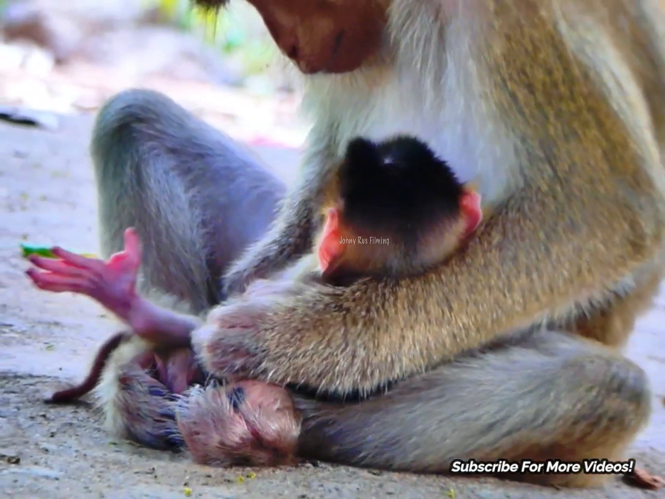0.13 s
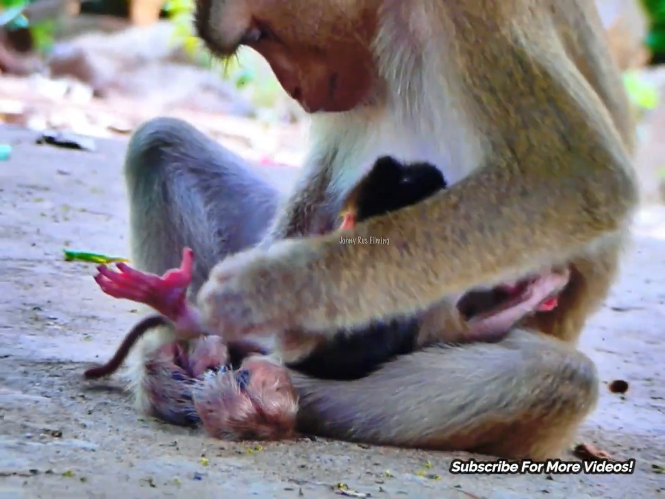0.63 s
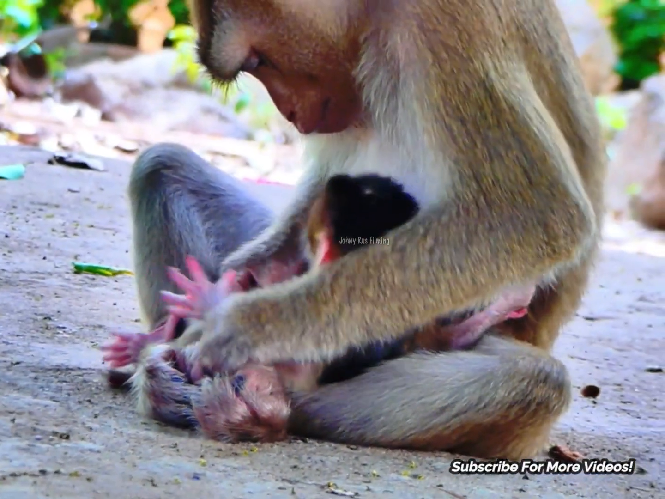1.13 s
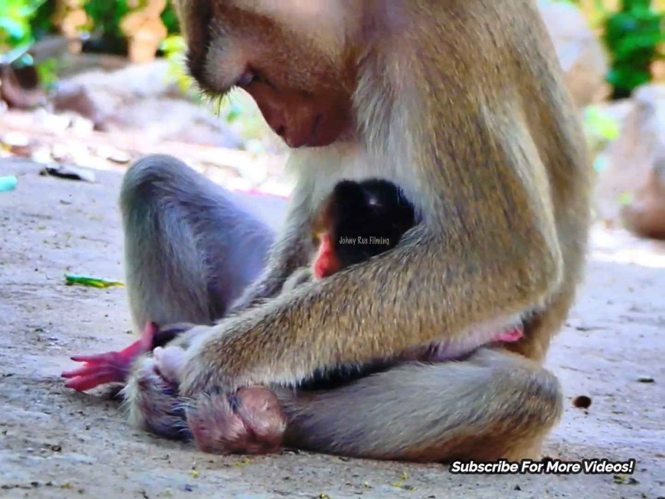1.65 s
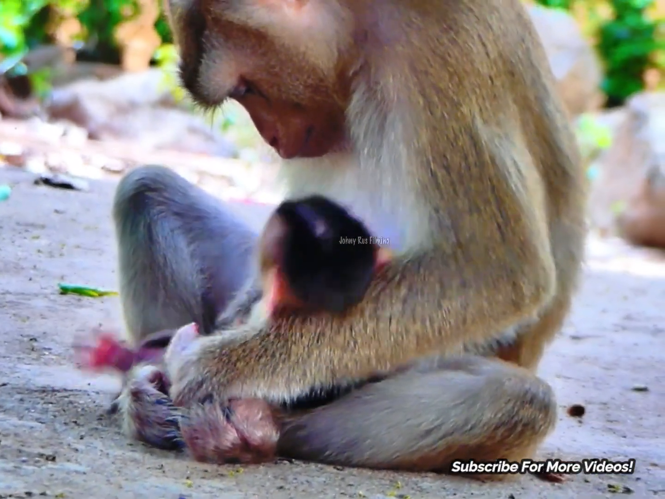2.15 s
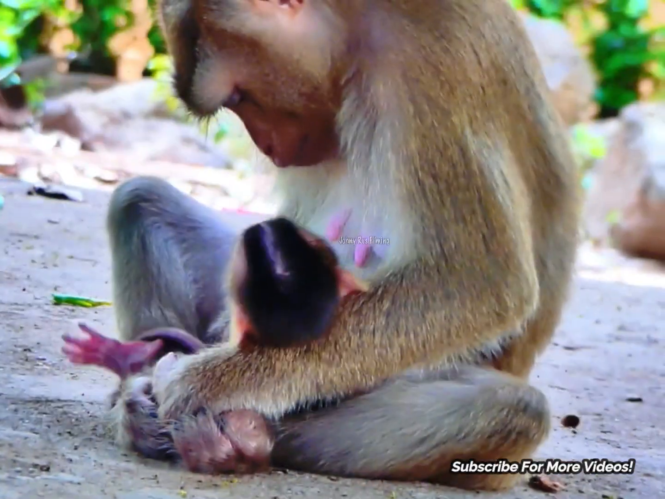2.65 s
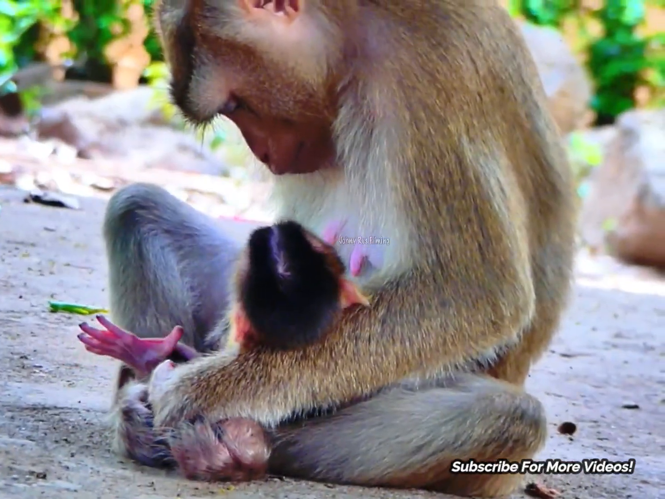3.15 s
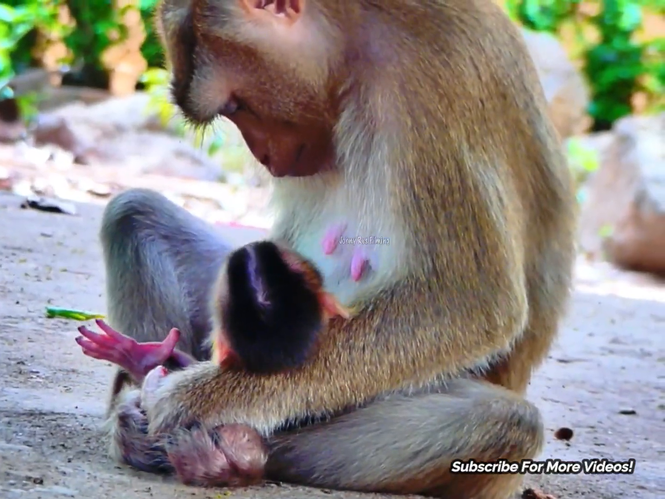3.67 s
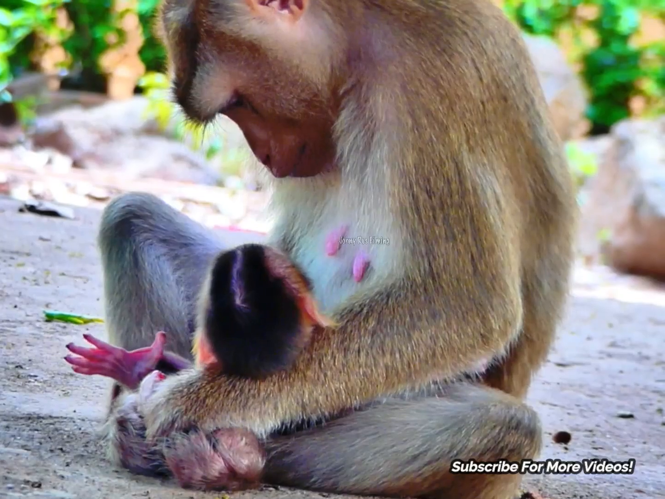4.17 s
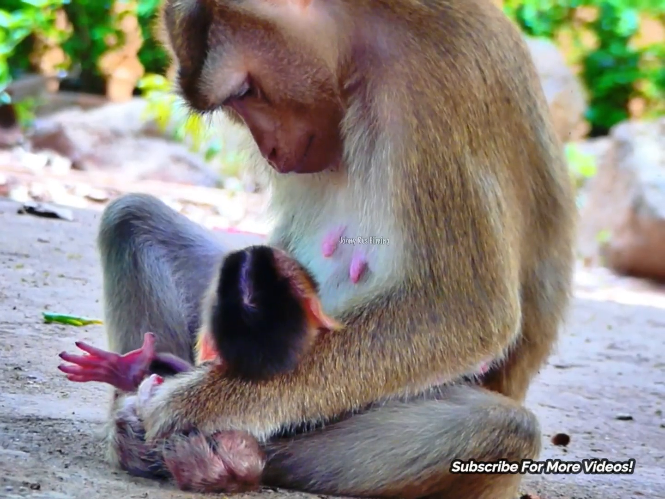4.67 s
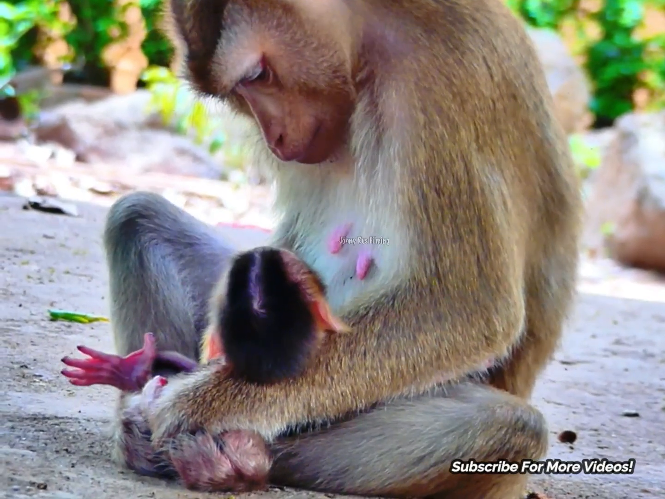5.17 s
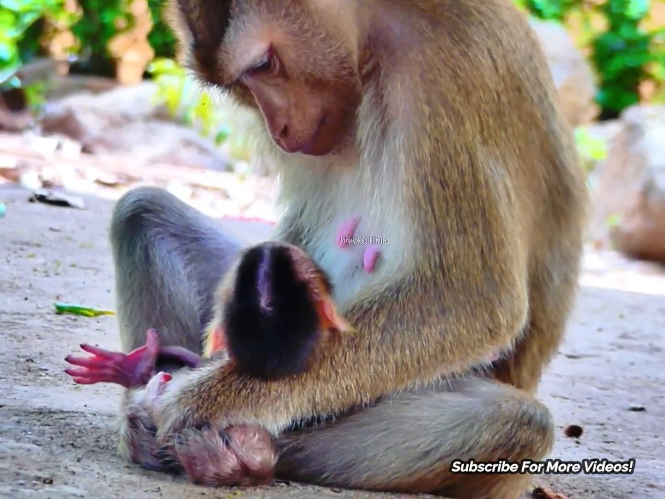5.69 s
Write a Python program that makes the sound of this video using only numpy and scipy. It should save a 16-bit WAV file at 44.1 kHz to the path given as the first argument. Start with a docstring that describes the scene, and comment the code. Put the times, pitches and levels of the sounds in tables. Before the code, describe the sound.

An open place under trees, with a steady soft wash of air, low wind swelling gently near 2.8 s, and a fuzzy insect whine flickering around 5 kHz with short cricket bursts. From 0 to 0.5 s a loud, close whistled trill leans left: six quick notes, each whipping upward, with close echoes. A tiny high bird chips about ten times a second almost throughout; a lower, rougher bird chips five or six times a second from 0.5 to 4.8 s, with short gaps. A young monkey gives brief fluttering, falling squeaks, the clearest near 2.2, 3.7 and 5.6 s, echoing through the trees. Soft breathy grunts come and go. Faint far coos drift from 1.7 to 4.6 s. Hands and feet scuff dry grit and leaves throughout, stronger around 2.65 s; twigs snap near 2.0, 3.0 and 4.3 s, and soft footfalls land near 2.7 and 5.5 s.

```python
"""Open ground under trees, with a soft wash of air, whining insects and light wind on the microphone.
At once a loud whistled trill of six rising notes close by, over two small birds chipping in steady rhythm;
then wet falling chirps from a young monkey and soft grunts, and later far coos, twig snaps and soft footfalls.
Hands and feet scuff the gritty ground throughout. Calls are swept tones, rustles are shaped noise, snaps are
ringing modes; sparse random echoes stand for the trunks and leaves that throw the calls back."""
import sys
import numpy as np
from scipy import signal
from scipy.io import wavfile
from scipy.ndimage import uniform_filter1d

SR = 44100
rng = np.random.default_rng(int(sys.argv[2]) if len(sys.argv) > 2 else 0)


def int16_out(signal):
    """Quantize to a 16-bit WAV file."""
    q = np.round(np.clip(np.atleast_2d(signal).T, -1, 1) * 32767)
    wavfile.write(sys.argv[1], SR, q.astype(np.int16))


def boost(x):
    """Linear amplitude factor 10**(x/20) for a level x in decibels (scalar or array-like)."""
    u = np.asarray(x, float) / 20
    return 10 ** u


N = 256220  # samples


def evened(x):
    """Scales to rms 1."""
    return x / np.sqrt(np.mean(x ** 2) + 1e-20)


def read(points, hz):
    """Reads a spectrum on a log-frequency axis."""
    f, value = np.transpose(points)
    return np.interp(np.log(hz + 1), np.log(f + 1), value)


def over_time(points):
    """Reads every column of a table against its first, t/s, at each sample."""
    s, *columns = np.transpose(points)
    return [np.interp(np.arange(N) / SR, s, column) for column in columns]


def add(mix, s, sound):
    """Mixes a sound in at s seconds."""
    part = mix[..., max(round(s * SR), 0):][..., :sound.shape[-1]]
    part += sound[..., :part.shape[-1]]


def sides(pan_db):
    """Left and right gains; pan_db is left over right."""
    return boost(np.array([[pan_db / 2], [-pan_db / 2]]))


def slow(rate_hz):
    """Slow random drift of rms 1, a sum of sines up to rate_hz."""
    t = np.arange(0, N, 64) / SR
    wave = np.zeros(len(t))
    for hz in np.geomspace(.15, rate_hz, num=20):
        wave += np.sin(2 * np.pi * (hz * t + rng.random())) / np.sqrt(hz)
    return np.repeat(evened(wave), 64)[:N]


def paired(a, b, c, d, same):
    """Two complex noises whose likeness is same (0-1)."""
    left, other = a + 1j * b, c + 1j * d
    return np.array([left, same * left + np.sqrt(1 - same ** 2) * other])


# likeness of left and right at the microphones: f/Hz, likeness/0-1
LIKENESS = [(60, .12), (400, 0.22), (1500, 0.19), (4000, 0.4), (12000, 0.6)]


def noise(colour, patchy_db, same=None):
    """Two-channel noise of a given spectrum with drifting patches, rms 1."""
    frames, hz = N // 128 + 6, np.fft.rfftfreq(512, 1 / SR)
    a, b, c, d, patches = rng.standard_normal((frames, 257, 5)).T
    patches = uniform_filter1d(patches, size=6, axis=0)  # over frequency
    patches = evened(uniform_filter1d(patches, size=20, axis=1))  # over time
    same = np.clip(read(LIKENESS, hz)[:, None] if same is None else same, 0, 1)
    z = paired(a, b, c, d, same) * boost(read(colour, hz)[:, None] + patchy_db * patches)
    return evened(signal.istft(z, nperseg=512, noverlap=384)[1][:, :N])


def fuzzy(hz, width_hz, same=0.59):
    """Noise squeezed into a narrow band around hz, rms 1: a hoarse tone."""
    low_pass = signal.butter(2, width_hz / SR, output="sos")
    fuzz = paired(*signal.sosfilt(low_pass, rng.standard_normal((N, 4)).T), same)
    return evened((fuzz * np.exp(2j * np.pi * hz * np.arange(N) / SR)).real)


def grains(per_s, spread_db, size):
    """Flickering gain of rms 1 from many tiny contacts of uneven strength, smoothed over size samples."""
    hits = boost(spread_db * np.minimum(rng.exponential(1, N), 4)) * (rng.random(N) < per_s / SR)
    return evened(0.099 + np.sqrt(abs(uniform_filter1d(hits ** 2, size))))


def whistle(hz, shape):
    """A pure tone on a pitch curve."""
    return shape * np.sin(2 * np.pi * np.cumsum(hz) / SR)


def trees(x, t60, gap=.004, same=.6):
    """Scatter from trunks and leaves: sparse random taps dying away after a gap in s, energy 1 on the left."""
    t = np.arange(SR // 2) / SR
    taps = rng.standard_normal((SR // 2, 3)).T * (rng.random((SR // 2, 3)).T < .15)
    taps = same * taps[2] + (1 - same) * taps[:2]
    taps = taps * boost(-60 * t / t60) * np.clip(t / gap - 1, 0, 1)
    return signal.fftconvolve(np.atleast_2d(x), taps / np.linalg.norm(taps[0]), axes=1)[:, :N]


# spectrum of the open air: f/Hz, level/dB per Hz (relative)
AIR_COLOUR = [(100, -22.5), (240, -6), (600, 0.5), (1130, 1.5), (1700, -4), (2400, -19), (3000, -26.5),
              (4100, -32), (4900, -20.5), (5800, -21.5), (7500, -9), (9000, -17), (11000, -21),
              (15800, -17.5)]


def air():
    """The steady wash of the place: coloured noise whose level drifts slightly."""
    return boost(-51 + 0.37 * slow(3.0)) * noise(AIR_COLOUR, 3.3)


# light wind on the microphone: t/s, level/dB
WIND_LEVEL = [(0.0, -64.5), (0.97, -67), (1.84, -62), (2.0, -65.5), (2.26, -62), (2.81, -55.5),
              (3.41, -65.5), (3.67, -61), (4.4, -61.5), (5.02, -67.5), (5.47, -61), (5.81, -63)]
# its spectrum: f/Hz, level/dB per Hz (relative)
WIND_SPECTRUM = [(15, -36), (35, -15), (70, -4.5), (150, -2.5), (300, -9), (500, -34.5)]


def wind():
    """Low rumble that swells and sinks, nearly unrelated at the two sides."""
    level_db, = over_time(WIND_LEVEL)
    return boost(level_db) * noise(WIND_SPECTRUM, 0.73, 0.06)


# the whine near 5 kHz before its flicker and band gains: t/s, level/dB
WHINE_LEVEL = [(0.0, -61), (0.31, -70), (0.68, -56.5), (1.2, -71.5), (1.55, -53), (1.72, -61.5),
               (2.17, -54), (2.67, -59.5), (3.15, -68), (3.67, -57), (4.0, -83), (4.27, -61), (4.4, -55.5),
               (5.1, -64.5), (5.24, -56.5), (5.81, -68)]
# its core and halo: f/Hz, width/Hz, gain/dB
WHINE_CORE_HALO = [(5020, 90, -1.5), (4900, 440, -2)]
# broad insect hiss: f/Hz, width/Hz, level/dB
INSECT_HISS = [(7800, 2300, -77)]
# cricket bursts before their beats: t/s (start), length/s, level/dB
CRICKET_BURSTS = [(0.188, 0.13, -53), (1.449, .04, -61.5), (2.073, 0.066, -54), (2.182, 0.073, -52.5),
                  (5.36, 0.16, -55), (5.677, 0.12, -55.5)]


def insects():
    """Fuzzy narrow-band whines, and a cricket scraping short bursts near 10 kHz."""
    whine = sum(boost(db) * fuzzy(hz, width_hz) for hz, width_hz, db in WHINE_CORE_HALO)
    level_db, = over_time(WHINE_LEVEL)
    out = whine * (0.41 + .4 * grains(90, 1.3, size=300)) * boost(level_db)
    out += sum(boost(db) * fuzzy(hz, width_hz) for hz, width_hz, db in INSECT_HISS)
    wing = fuzzy(9800, width_hz=330)
    for start, length, db in CRICKET_BURSTS:
        t = np.arange(round(length * SR)) / SR
        beats = (1 - .2 * np.cos(2 * np.pi * 58 * t)) * signal.windows.tukey(len(t), .5)
        add(out, start, boost(db) * beats * wing[:, round(start * SR):][:, :len(t)])
    return out


# far coos, dry, before scoop and waver: t/s (start), length/s, f/Hz (first), f/Hz (last), level/dB (opening)
FAR_COOS = [(1.695, .18, 1213, 1143, -43.5), (1.934, 0.027, 1087, 1140, -38),
            (2.05, 0.073, 1112, 1178, -41.5), (2.30, 0.073, 1142, 1147, -49),
            (2.941, 0.087, 1108, 1053, -50.5), (3.632, .17, 1616, 1380, -47.5),
            (4.15, 0.145, 1215, 1172, -43), (4.505, 0.13, 1178, 1150, -51.5)]


def coos():
    """Soft far whistles that scoop up gently, glide and fade, wavering and blurred by distance."""
    rise_s, fade_db, breath_depth, waver_hz, scoop_hz = .015, -5, .35, 22, 90
    dry = np.zeros(N)
    drifts = uniform_filter1d(rng.standard_normal((2, N)), size=400, axis=1)
    waver, breath = (evened(uniform_filter1d(z, size=400)) for z in drifts)
    for start, length, hz0, hz1, db in FAR_COOS:
        t = np.arange(round(length * SR)) / SR
        shape = np.minimum(t / rise_s, 1) * boost(db + fade_db * t / length)
        shape = shape * signal.windows.tukey(len(t), .3)
        hz = hz1 + (hz0 - hz1) * (1 - t / length) ** 1.526
        hz = hz + waver_hz * waver[round(start * SR):][:len(t)] - scoop_hz * np.exp(-t / rise_s)
        add(dry, start, whistle(hz, shape))
    dry = dry * (1 + breath_depth * breath)
    return dry * sides(6.5) + boost(-3) * trees(dry, .45, gap=.004, same=.4)


def strokes(rows, rise_db_per_s, fall_db_per_s):
    """Power envelope of each (s, hold s) stroke at unit strength: rises, holds, dies away."""
    t, (s, hold) = np.arange(N) / SR, np.array(rows)[:, :2].T[..., None]
    before, after = np.maximum(s - t, 0), np.maximum(t - s - hold, 0)
    return boost(-rise_db_per_s * before - fall_db_per_s * after) ** 2


def layered(steady_db, stroke_db, shapes):
    """Gain of a steady level with strokes on top, summed as power."""
    return np.sqrt(boost(steady_db) ** 2 + boost(stroke_db) ** 2 @ shapes)


# strokes over dry grit: t/s, hold/s, level/dB, crispness/dB (top over level), coarseness/dB (bottom over level)
GRIT_STROKES = [(0.323, 0.13, -54, -5, -5), (0.666, .02, -56, -6, -10), (0.807, 0.018, -51, -8, -3.5),
                (1.013, 0.046, -47.5, -2.5, -10), (2.023, .004, -46, -18, -2), (2.426, .05, -60, -2, -6),
                (2.72, .02, -59, -15, -2), (2.812, 0.044, -55.5, -18, 0), (2.971, 0.013, -45, -17, 2),
                (3.124, 0.034, -48, -13, 1.8), (3.206, 0.021, -55, -9, 7), (4.279, 0.018, -45.5, -1, 2.5),
                (4.39, 0.0093, -51, -1, 4), (5.39, .05, -63, -10, -3.5), (5.73, 0.057, -64, -3, -16)]
# rustle of leaves between strokes: t/s, level/dB near 9 kHz, level/dB near 14 kHz, level/dB near 5 kHz
LEAF_RUSTLE = [(0.0, -62.5, -75, -75), (0.3, -62, -57, -58), (0.9, -62.5, -63.5, -68),
               (1.3, -74, -72.5, -70), (1.97, -68, -68.5, -65.5), (2.15, -58.5, -62, -59.5),
               (2.65, -66, -72, -54), (3.2, -52, -61, -61), (3.4, -73, -73, -66), (3.8, -84, -81, -58),
               (4.2, -60, -62, -68), (4.5, -66, -63, -59), (4.7, -86.5, -82, -64), (5.3, -68, -67, -80),
               (5.81, -66.5, -68, -84)]
# middle, top and bottom of the grit: f/Hz, level/dB per Hz (relative)
GRIT_MID_COLOUR = [(6000, -34), (7500, -5), (9500, -1.5), (12000, -6), (13500, -39)]
GRIT_TOP_COLOUR = [(11500, -22.5), (13000, 2), (14800, -6.5), (15750, -3), (15950, -50.5)]
GRIT_BOTTOM_COLOUR = [(2600, -64), (3800, 2), (5800, -0.5), (7000, 0.5), (8000, -31.5)]


def grit():
    """Bright crackle of hands and feet on grit and leaves: three noise bands broken into grains."""
    mid_db, top_db, bottom_db = over_time(LEAF_RUSTLE)
    shapes = strokes(GRIT_STROKES, rise_db_per_s=664, fall_db_per_s=150)
    stroke_db, crisp_db, coarse_db = np.transpose(GRIT_STROKES)[2:]
    out = layered(mid_db, stroke_db, shapes) * noise(GRIT_MID_COLOUR, 1.6, 0.54)
    out += layered(top_db, stroke_db + crisp_db, shapes) * noise(GRIT_TOP_COLOUR, 1.5, 0.3)
    out += layered(bottom_db, stroke_db + coarse_db, shapes) * noise(GRIT_BOTTOM_COLOUR, 3.0, .7)
    return out * grains(3000, 2.2, size=90) * sides(1.2)


# duller scuffs on the ground: t/s, hold/s, level/dB near 2 kHz, weight/dB (low part over level)
GROUND_SCUFFS = [(0.0, .005, -48.5, -9), (0.21, .02, -60, -12), (0.44, 0.078, -47.5, -14),
                 (0.689, 0.022, -68, 21), (1.538, 0.035, -59.5, -8.5), (2.042, .02, -49, -2.5),
                 (2.445, 0.016, -52, -19), (2.651, 0.015, -39, -8), (2.80, .01, -59, 4),
                 (3.194, 0.061, -50, 1.5), (3.86, 0.024, -52.5, -3), (3.943, .01, -43.5, -5.5),
                 (3.987, 0.012, -65, 14), (4.745, 0.036, -53.5, 0), (5.316, 0.019, -67.5, 17.5),
                 (5.63, .02, -56.5, 4.5), (5.74, .02, -66, -20)]
# dull rustle between scuffs: t/s, level/dB near 2 kHz, level/dB near 700 Hz
DULL_RUSTLE = [(0.0, -53, -66), (0.4, -53.5, -51), (0.85, -57, -50.5), (1.05, -54.5, -58),
               (1.15, -80.5, -80.5), (1.421, -68, -65.5), (1.6, -49.5, -49.5), (1.95, -62.5, -50),
               (2.35, -61.5, -50.5), (2.55, -50.5, -51), (3.1, -60, -50.5), (3.4, -59, -49),
               (3.75, -64.5, -57.5), (4.3, -58, -50.5), (4.7, -67, -58.5), (4.95, -62, -52.5),
               (5.3, -63, -61), (5.81, -55, -75)]
# rasp and low body of the scuffs: f/Hz, level/dB per Hz (relative)
RASP_COLOUR = [(900, -50), (1400, -7), (2000, 2), (3000, -4), (4500, -9.5), (7000, -28.5)]
BODY_COLOUR = [(120, -56), (300, -2), (700, -1.5), (1100, 1.5), (1500, 2), (2200, -39.5)]


def scuffs():
    """Hands and feet drag over the ground: a grainy mid rasp of noise and a smoother low body."""
    rasp_db, body_db = over_time(DULL_RUSTLE)
    shapes = strokes(GROUND_SCUFFS, rise_db_per_s=149, fall_db_per_s=121)
    stroke_db, weight_db = np.transpose(GROUND_SCUFFS)[2:]
    rasp = layered(rasp_db, stroke_db, shapes) * noise(RASP_COLOUR, 2.21, 0.17)
    body = layered(body_db, stroke_db + weight_db, shapes) * noise(BODY_COLOUR, 2.9, 0.067)
    return rasp * grains(640, 0.6, size=150) + body


# twig snaps: t/s, level/dB (drive of the modes), brightness/dB per octave about 4.4 kHz, left over right/dB
TWIG_SNAPS = [(2.0161, -18, -7, 4), (2.961, -36, 3, 2.5), (3.007, -36, 3, 0), (4.274, -35, 2, 0),
              (4.2845, -29, 2.5, 0), (4.3728, -38, -1.5, -3), (4.3830, -25.5, 5, -3)]
# ringing modes of a twig: f/Hz, level/dB, t60/s
TWIG_MODES = [(2700, -12, 0.005), (4400, -1.5, 0.0061), (6020, -2, 0.005), (8800, -7, .003),
              (10200, -4, 0.004), (11800, -4, .003), (14600, -2, .003)]


def snaps():
    """Twigs snap: a handful of modes ring very briefly, then scatter among the trees."""
    t, out = np.arange(round(.07 * SR)) / SR, np.zeros((2, N))
    for s, db, bright_db, pan_db in TWIG_SNAPS:
        ring = np.zeros(len(t))
        for hz, mode_db, t60 in TWIG_MODES:
            ring_db = mode_db + bright_db * np.log2(hz / 4400) - 60 * t / t60
            ring += boost(ring_db) * np.sin(2 * np.pi * hz * t)
        add(out, s, boost(db) * ring * sides(pan_db))
    out = signal.sosfilt(signal.butter(3, 1900, "high", fs=SR, output="sos"), out)
    return out + boost(-3.0) * trees(out, 0.21, gap=0.0015, same=0.53)


# soft footfalls: t/s (middle), f/Hz, level/dB (of the fundamental)
FOOTFALLS = [(2.631, 140, -54), (2.784, 138, -53.5), (5.319, 148.6, -53.5), (5.544, 146.7, -42)]


def footfalls():
    """Each step is a short low push with its octave."""
    t, out = np.arange(round(.07 * SR)) / SR, np.zeros((2, N))
    for s, hz, db in FOOTFALLS:
        push = np.sin(2 * np.pi * hz * t) + 0.49 * np.sin(2 * np.pi * 2 * hz * t)
        add(out, s - .035, boost(db) * push * np.hanning(len(t)) * sides(.1))
    return out


# chips of the lower bird, before roughening: t/s (middle), level/dB (peak), f/Hz (arch reaches 1.02 of it)
LOW_BIRD_CHIPS = [(0.4916, -42, 4000), (0.7136, -44, 4250), (0.892, -47, 4250), (1.067, -43, 4030),
                  (1.247, -44, 4180), (1.939, -50.5, 4050), (2.1139, -41, 4130), (2.2896, -45, 4160),
                  (2.46, -44.5, 4170), (2.648, -37.5, 4180), (2.814, -42.5, 3960), (3.0, -40, 4050),
                  (3.1765, -36.5, 4170), (3.349, -43, 4070), (3.5253, -35.5, 4110), (3.7138, -40, 3986),
                  (3.909, -43, 4160), (4.0936, -36.5, 4065), (4.4531, -37, 4020), (4.6336, -42.5, 4040),
                  (4.8273, -42, 4096)]


def low_bird():
    """A slightly rough chip that arches up and drops off, with its scatter from the leaves."""
    u, dry = np.linspace(0, 1, round(0.01976 * SR)), np.zeros(N)
    arch = np.interp(u, [0, .3, .55, 1], [.95, 1.01, 1.02, .85])
    for s, db, hz in LOW_BIRD_CHIPS:
        add(dry, s - .010, whistle(hz * arch, boost(db) * np.sin(np.pi * u ** 1.5)))
    roughness = evened(uniform_filter1d(rng.standard_normal(N), size=60))
    dry = dry * (1 + .45 * roughness)
    scatter = boost(.5) * trees(dry, .4, gap=.001, same=.6)
    return (dry + scatter) * sides(3.2)


# chips of the high bird, dry: t/s (middle), level/dB
HIGH_BIRD_CHIPS = [(0.0158, -41.5), (0.1136, -41), (0.2142, -39.5), (0.3145, -39.5), (0.412, -39),
                   (0.514, -41), (0.6184, -45.5), (0.7206, -43.5), (0.8243, -44), (0.9279, -41.5),
                   (1.047, -44), (1.158, -45), (1.2597, -42.5), (1.355, -40.5), (1.4676, -42.5),
                   (1.7614, -44), (1.8603, -42.5), (1.969, -46), (2.054, -40), (2.146, -39.5),
                   (2.2483, -43), (2.354, -40.5), (2.4692, -37), (2.57, -40.5), (2.6806, -42),
                   (2.776, -37.5), (2.8701, -41), (2.9573, -37.5), (3.0717, -33.5), (3.1604, -37.5),
                   (3.2487, -35.5), (3.3383, -38.5), (3.4322, -41.5), (3.525, -37), (3.623, -39),
                   (3.716, -38), (3.812, -37.5), (3.9101, -37.5), (4.007, -41), (4.1018, -41), (4.203, -40),
                   (4.2947, -39), (4.392, -38), (4.4886, -37), (4.585, -41.5), (4.683, -39.5),
                   (4.7834, -38.5), (4.8875, -43), (4.9914, -41.5), (5.091, -43), (5.199, -43),
                   (5.3041, -43), (5.4017, -41.5), (5.502, -41.5), (5.608, -42), (5.7125, -39.5)]


def high_bird():
    """A tiny falling chip about ten times a second, each led by one no louder, often fainter."""
    u, dry = np.linspace(0, 1, round(.012 * SR)), np.zeros(N)
    chip = whistle(7000 + 1350 * (1 - u) ** 1.29, np.hanning(len(u)))
    leads_db = rng.uniform(-28.0, 0.0, len(HIGH_BIRD_CHIPS))
    for (s, db), lead_db in zip(HIGH_BIRD_CHIPS, leads_db):
        add(dry, s - .007, boost(db) * chip)
        add(dry, s - .025, boost(db + lead_db) * chip)
    return dry * sides(-1.2) + boost(-1.5) * trees(dry, 0.19, gap=0.0028, same=0.71)


# soft hoarse grunts, a row for each band that sounds: t/s (middle), length/s, f/Hz, width/Hz,
# level/dB (before the swell of each)
GRUNT_BANDS = [(0.498, 0.13, 1944, 300, -49), (0.713, 0.075, 774.5, 514, -43), (1.61, 0.082, 518, 253, -54),
               (2.66, 0.14, 1940, 350, -54), (3.06, 0.057, 1248, 121, -51), (3.231, 0.13, 1338, 121, -48),
               (3.227, 0.11, 1080, 100, -50), (3.248, 0.13, 770, 147, -54), (3.942, .09, 2123, 248, -50),
               (3.958, 0.079, 1110, 202, -42.5), (4.007, 0.085, 875, 57, -47),
               (4.307, 0.1, 1059, 152, -48.5), (4.346, .07, 781, 79, -52), (4.45, .05, 535, 100, -54.5),
               (4.959, 0.2, 1030, 202, -52), (5.327, 0.053, 2397, 250, -49.5), (5.458, .08, 1090, 102, -52),
               (5.756, 0.079, 2180, 403, -52)]


def grunts():
    """Brief breathy throat tones from the animals nearby: narrow noise bands swelling and fading."""
    out = np.zeros((2, N))
    for s, length, hz, width_hz, db in GRUNT_BANDS:
        size = round(length * SR)
        breath = rng.standard_normal((size, 2)) @ [1, 1j]
        band = signal.sosfilt(signal.butter(2, width_hz / SR, output="sos"), breath)
        tone = evened((band * np.exp(2j * np.pi * hz * np.arange(size) / SR)).real)
        add(out, s - length / 2, boost(db) * tone * np.hanning(size) * sides(1.3))
    return out + boost(1.5) * trees(out.mean(0), 0.28, gap=0.001, same=0.16)


# falling chirps of the young monkey, before flutter: t/s (start), length/s, f/Hz (first), f/Hz (last),
# level/dB (of the voice feeding both the direct path and the trees)
MONKEY_CHIRPS = [(0.275, 0.056, 5450, 3834, -41), (0.941, 0.032, 6420, 5320, -46.5),
                 (0.999, 0.045, 5280, 4360, -44), (1.327, 0.029, 5310, 4250, -49),
                 (2.203, 0.034, 7110, 4560, -34), (2.523, 0.12, 5580, 4480, -52),
                 (3.125, 0.049, 5570, 4900, -49.5), (3.211, 0.046, 4940, 4100, -47),
                 (3.465, 0.052, 4670, 3820, -49), (3.51, 0.037, 5550, 4400, -46.5),
                 (3.676, 0.029, 4600, 3570, -40.5), (3.703, 0.019, 7000, 4900, -31),
                 (4.243, 0.062, 4510, 3420, -41.5), (5.052, 0.05, 5100, 3200, -56.5),
                 (5.625, 0.025, 6840, 5425, -31)]


def chirps():
    """Quick falling squeaks with a fluttering, unsteady voice, heard mostly through the trees."""
    voice = np.zeros(N)
    for start, length, hz0, hz1, db in MONKEY_CHIRPS:
        t = np.arange(round(length * SR)) / SR
        flutter = np.cos(2 * np.pi * 230 * t)  # moves pitch and loudness together
        hz = hz1 + (hz0 - hz1) * (1 - t / length) ** 1.3 + 150 * flutter
        shape = boost(db) * (1 + 1.7 * flutter) * np.sin(np.pi * t / length) ** 0.57
        add(voice, start - .004, whistle(hz, shape))
    return boost(-11) * voice + boost(0.5) * trees(voice, 0.46, gap=0.0017, same=0.66)


# trill notes close by, before panning: t/s (start), t/s (end), f/Hz (base), f/Hz (top),
# lateness of the rise/power, level/dB (peak), opening/dB (re the peak)
TRILL_NOTES = [(.008, 0.056, 2350, 3240, 2.12, -20.5, -17.5), (0.088, 0.155, 2456, 3504, 3.9, -14, -20.5),
               (0.181, 0.239, 2701, 3386, 4.8, -11, -14), (0.268, 0.322, 2690, 3336, 3.97, -9.5, -11),
               (0.358, 0.398, 2740, 3213, 2.64, -10, -9.5), (0.428, 0.479, 2795, 3275, 3.15, -12, -2.5)]
# close echoes of the trill, before their lean to the right: delay/s, left level/dB, right level/dB
CLOSE_ECHOES = [(.00728, -2.5, -4), (.0150, -14, -13), (.0245, -13, -14)]


def trill():
    """Each note swells on a level pitch, whips upward and rounds off; close echoes beat against the rise."""
    dry, dull = np.zeros((2, N))
    for start, end, hz0, hz1, late, db, opening_db in TRILL_NOTES:
        u = np.linspace(0, 1, round((end - start) * SR))
        swell_db = np.interp(u, [.15, .68, .8, 1], [opening_db, 0, -1.5, -7])
        rise = np.sin(.57 * np.pi * u ** late) ** 1.3
        hz = hz0 + (hz1 - hz0) * rise + 45 * np.exp(-u / 0.096)
        note = whistle(hz, boost(db + swell_db) * signal.windows.tukey(len(u), .22))
        add(dry, start, note)
        add(dull, start, note * boost(-9.0 * rise))  # rough bark returns the top of the rise less well
    out = dry * sides(-8.5)
    for delay, *db in CLOSE_ECHOES:
        add(out, delay, dull * sides(-6.5) * boost(np.array(db))[:, None])
    return out + boost(-6.0) * trees(dry, 0.24, gap=0.0053, same=0.92) * sides(-4.5)


def scene():
    """All sources over the open-air wash and a little wind."""
    background = air() + wind() + insects() + coos()
    ground = grit() + scuffs() + snaps() + footfalls()
    animals = low_bird() + high_bird() + grunts() + chirps() + trill()
    return background + ground + animals


def band_limit(x):
    """A steep low-pass at the top of the band."""
    return signal.sosfilt(signal.butter(12, 16800, fs=SR, output="sos"), x)


def record(dry):
    """Limits the band steeply at 15850 Hz and finishes the mix."""
    edge = signal.firwin(255, 15850, window=("kaiser", 8), fs=SR)
    mix = signal.oaconvolve(dry, edge[None], "same")
    return band_limit(mix)


dry = scene()
out = record(dry)
int16_out(out)
```